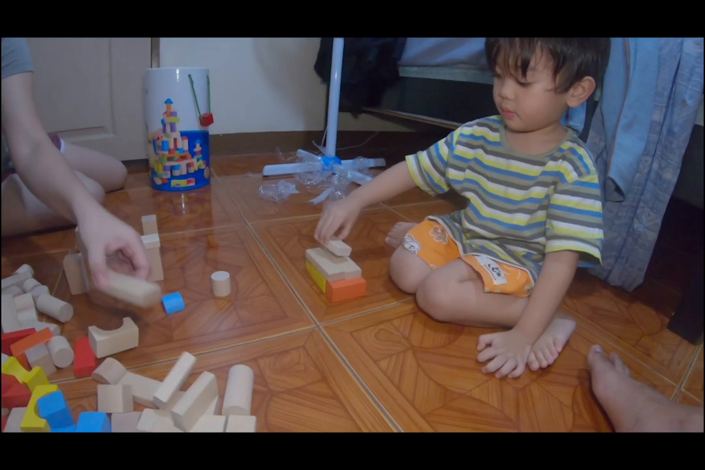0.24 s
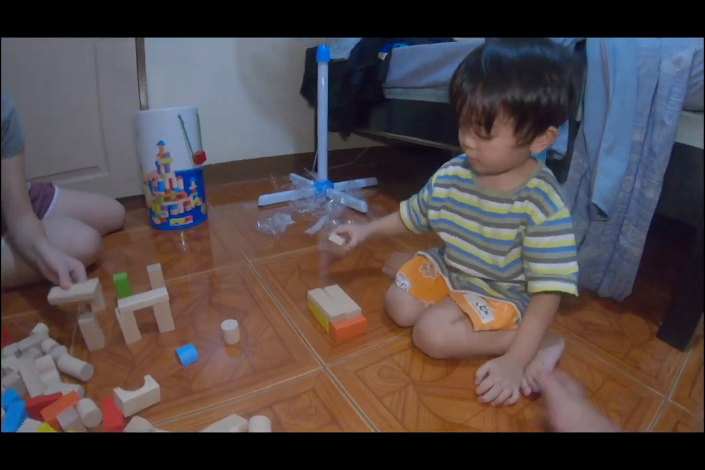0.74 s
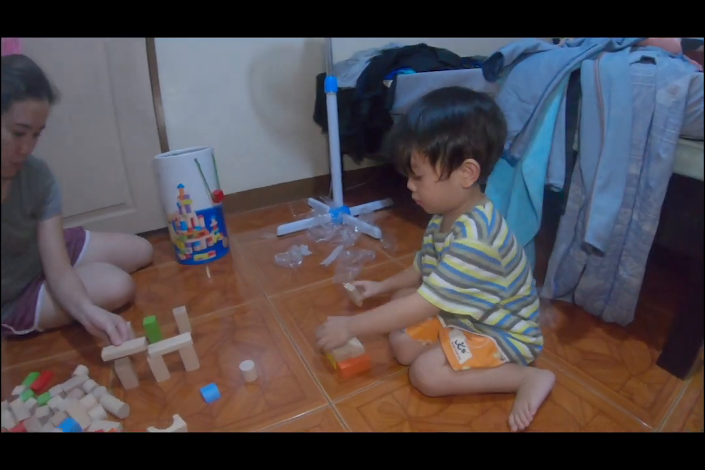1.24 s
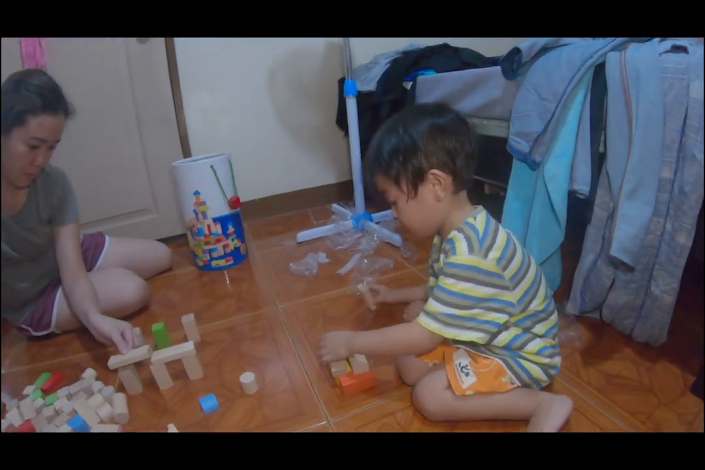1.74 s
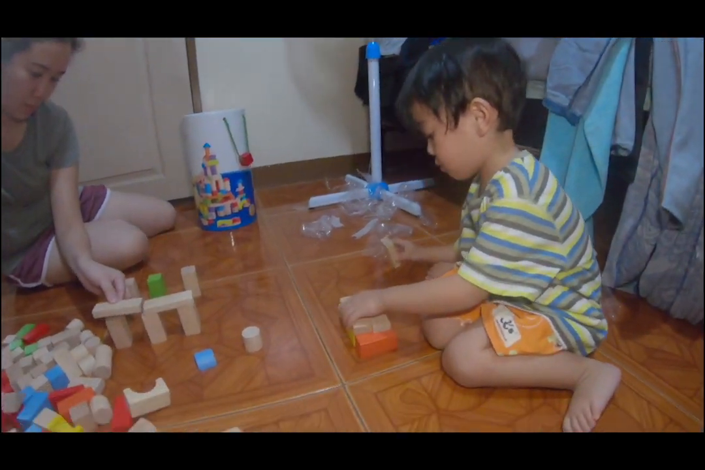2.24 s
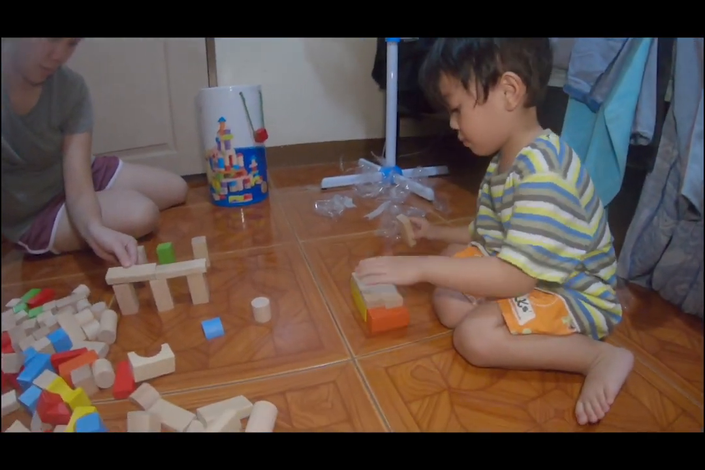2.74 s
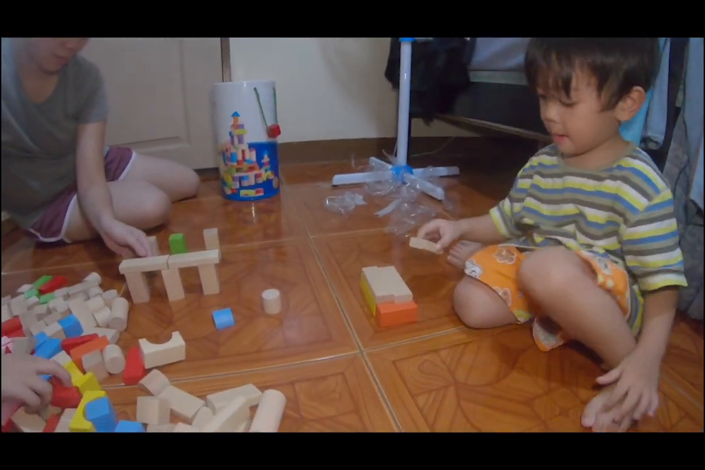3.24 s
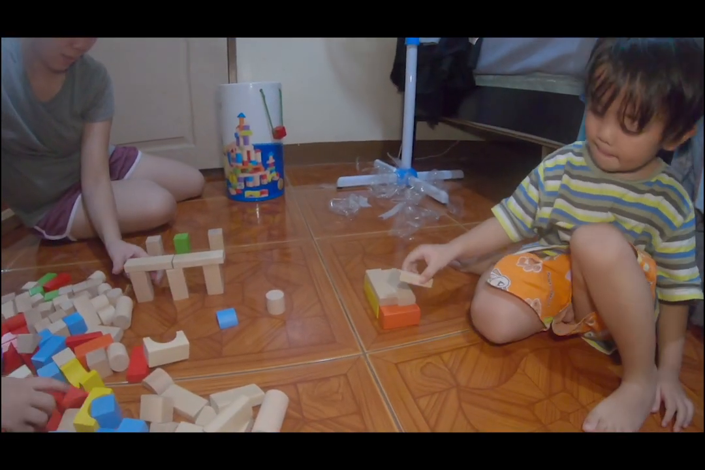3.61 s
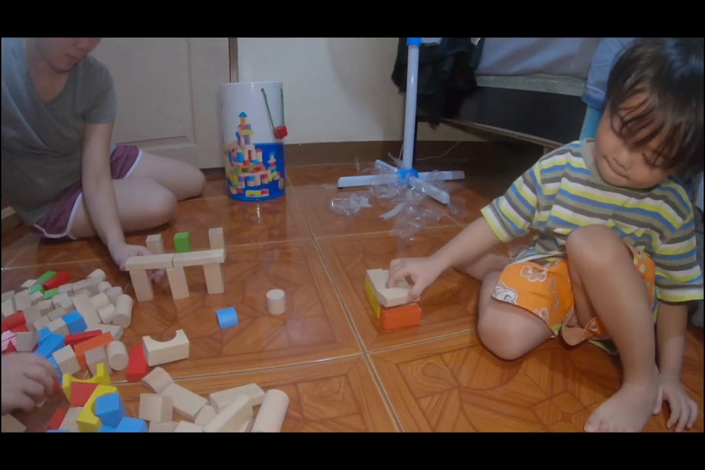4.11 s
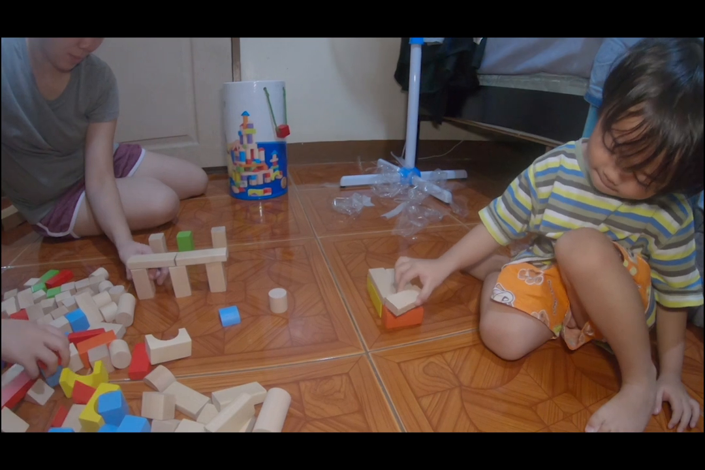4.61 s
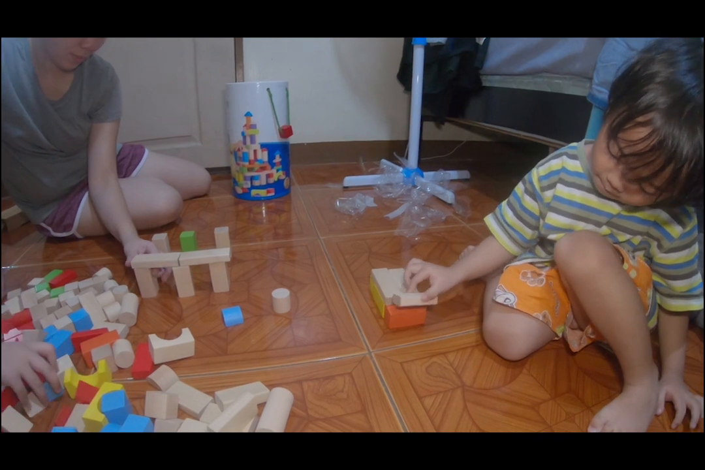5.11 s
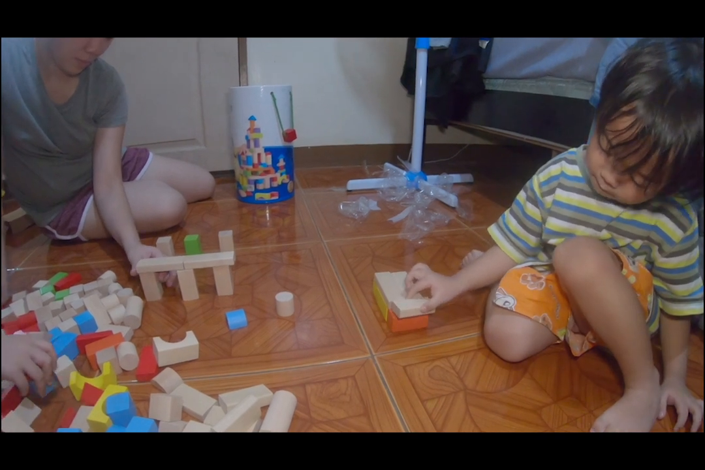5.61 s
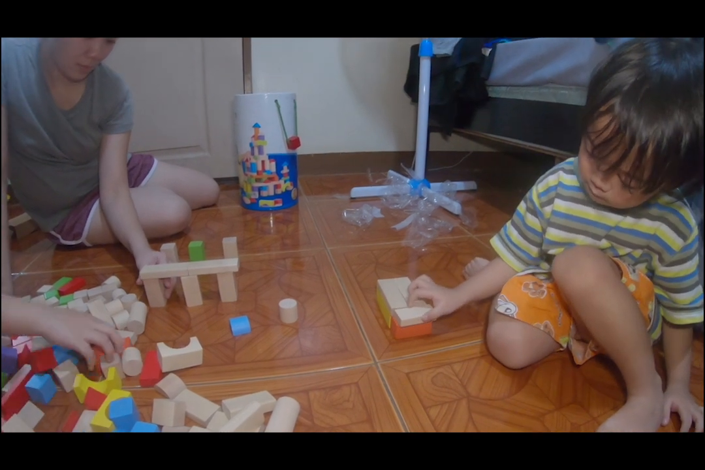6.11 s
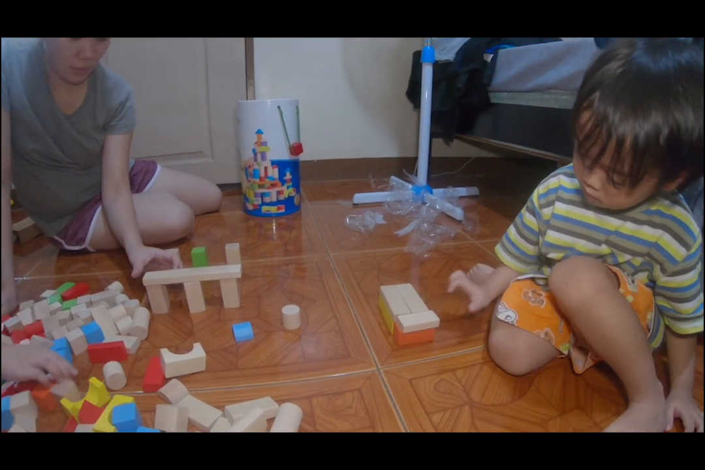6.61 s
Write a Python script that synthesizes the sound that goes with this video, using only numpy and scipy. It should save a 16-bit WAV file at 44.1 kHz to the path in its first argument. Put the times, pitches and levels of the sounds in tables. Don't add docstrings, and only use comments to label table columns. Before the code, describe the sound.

Small wood blocks are set down, stacked and shuffled on tile, with a loud clattering burst midway and soft fan noise behind.

```python
import sys
import numpy as np
from scipy import signal
from scipy.fft import rfft, irfft, next_fast_len
from scipy.io import wavfile
from scipy.ndimage import uniform_filter1d, map_coordinates

SR = 44100
rng = np.random.default_rng(int(sys.argv[2]) if len(sys.argv) > 2 else 0)


def linear_from_db(decibels):
    return 10 ** (np.asarray(decibels, float) / 20)


def inscribe(sig):
    pcm = np.round(np.clip(np.atleast_2d(sig).T, -1, 1) * 32767)
    wavfile.write(sys.argv[1], SR, pcm.astype(np.int16))


N = 302524


def along(points, hz):
    f, v = np.transpose(points)
    return np.interp(np.log(hz + 1), np.log(f + 1), v)


def unit(x):
    return x / np.sqrt(np.mean(x ** 2) + 1e-20)


def wobble(rate):
    knots = rng.standard_normal(int(N * rate / SR) + 4)
    return map_coordinates(knots, [np.arange(N) * rate / SR])


def noise(spectrum):
    m = next_fast_len(N + 8192)
    gain = linear_from_db(along(spectrum, np.fft.rfftfreq(m, 1 / SR)))
    return unit(irfft(rfft(rng.standard_normal(m)) * gain, m)[:N])


def steady(x, span_s):
    power = np.abs(uniform_filter1d(x ** 2, int(span_s * SR)))
    return unit(x / np.sqrt(power + 0.072))


def causal(gain, lag_s):
    cepstrum = irfft(np.log(gain + 1e-6))
    cepstrum[1:len(gain) - 1] *= 2
    cepstrum[len(gain):] = 0
    phase = np.pi * SR / len(gain) * np.cumsum(lag_s)
    return irfft(np.exp(rfft(cepstrum) - 1j * phase))


# f/Hz, T60/s
REVERBERATION = [(500, 0.23), (1500, 0.3), (4000, 0.3), (9000, 0.25), (13000, 0.16), (16000, 0.106)]
# delay t/s, level/dB
REFLECTIONS = [(.0027, -5), (.005, -9.5), (.013, -14), (.019, -21)]


def room_answers(wet_db, build_s, count=24):
    hz, t, z = signal.stft(rng.standard_normal((count, SR * 2 // 5)), SR, nperseg=256)
    decay = linear_from_db(-60 * t / along(REVERBERATION, hz)[:, None])
    tails = signal.istft(z * decay, SR, nperseg=256)[1]
    since = np.arange(tails.shape[1]) / SR
    tails = tails * (1 - np.exp(-since / build_s) + 0.43 * np.exp(-since / 0.008))
    tails *= linear_from_db(18 * uniform_filter1d(rng.standard_normal(tails.shape), size=100, axis=1))
    tails = linear_from_db(wet_db) * tails / np.linalg.norm(tails, axis=1, keepdims=True)
    tails[:, 0] = 1
    for s, db in REFLECTIONS:
        delays = np.round(s * SR * rng.uniform(.92, 1.08, count)).astype(int)
        tails[np.arange(count), delays] += linear_from_db(db)
    return tails


def among(s, times):
    return np.min(np.abs(s - np.array(times))) < .003


INDIRECT = [0, .831, 3.255, 3.699, 4.992, 5.046, 5.056, 5.836, 6.376, 5.932, 6.322, 6.433, 6.5905, 6.609,
            6.72]
NEAR = [.746, 3.0268, 3.0635, 3.0775, 3.1118, 3.239, 3.343, 4.386, 4.426, 5.848, 6.155, 6.237, 6.2595]
INDIRECT_DB, NEAR_DB = -8, -4
LIGHT_DRY = .1


def place(out, s, direct, spread, answer, db):
    room_db = LIGHT_DRY * db + NEAR_DB * among(s, NEAR)
    heard = signal.fftconvolve(spread, np.r_[0, linear_from_db(room_db) * answer[1:]])
    heard[:len(direct)] += direct * linear_from_db(INDIRECT_DB * among(s, INDIRECT))
    out[round(s * SR):][:len(heard)] += heard


# t/s, peak level/dB, body mode f/Hz, sharpness level/dB
STACKED = [(0.0, -17, 2960, -18), (0.274, -35, 2720, -39), (0.334, -22, 3970, -30),
           (0.368, -12.5, 4300, -29), (0.417, -22, 3100, -28), (0.473, -27, 1900, -22),
           (0.4992, -17.5, 1710, -23), (0.64, -15, 1930, -25), (0.875, -29, 2600, -23),
           (0.938, -22, 1720, -23), (1.265, -8.5, 1830, -23), (2.768, -17.5, 2530, -20.5),
           (2.986, -13.5, 2630, -12.5), (3.0056, -9, 4270, -19), (3.063, -6, 4300, -35),
           (3.117, -9, 3930, -3), (3.239, -9, 2570, -26), (3.482, -39, 2700, -38), (3.682, -18, 4300, -19),
           (3.699, -10.5, 2400, -21), (3.877, -27, 2230, -24), (3.958, -33.5, 3600, -25),
           (4.14, -29, 3820, -33), (4.386, -31, 3630, -30), (5.046, -25, 1740, -40),
           (5.136, -32, 3770, -33), (5.312, -8, 3900, -40), (5.861, -10.5, 1650, -33),
           (6.238, -24.5, 3860, -20), (6.322, -11, 1740, -31)]
ROCKED = [(.065, -27, 990, -42), (0.476, -26, 1400, -35), (.838, -26, 2220, -22), (0.9332, -35, 1470, -35),
          (1.256, -23, 1800, -41), (1.306, -33, 1820, -35), (1.374, -40, 2780, -37),
          (1.674, -49, 1500, -40), (1.697, -43, 1520, -40), (2.038, -43, 1510, -34),
          (2.715, -36, 1500, -35), (3.0832, -11, 1300, -35), (3.584, -42, 800, -40),
          (3.604, -25, 1410, -32), (4.149, -30.5, 1506, -35), (4.4412, -36, 2580, -35.5),
          (5.056, -30, 1214, -40), (5.157, -31, 1200, -35), (5.207, -34, 1210, -40),
          (5.615, -41, 1190, -34), (5.854, -22, 1500, -35), (5.924, -18, 1280, -23),
          (6.269, -32, 1400, -35), (6.353, -25, 1290, -35), (6.377, -24, 1300, -26),
          (6.458, -18, 1200, -34), (6.58, -24, 1210, -40)]
CLICKED = [(0.079, -29, 4700, -16.5), (0.211, -41, 4000, -28), (0.425, -19, 3050, -21),
           (1.7358, -13, 1690, -32), (2.1372, -10, 1580, -17), (2.902, -22, 1900, -31),
           (3.0425, -5.5, 4200, -16), (3.137, -12, 3800, -15), (3.1483, -10, 3800, -28),
           (3.162, -16, 3960, -36), (3.255, -8.5, 2460, -19.5), (3.343, -18.5, 3800, -10.5),
           (3.814, -31, 4020, -14), (3.86, -26.5, 3330, -29), (3.89, -25, 1570, -37),
           (4.481, -47, 3000, -28), (4.889, -28.5, 2580, -43), (5.9325, -8, 4400, -29),
           (6.155, -25.5, 3500, -35), (6.398, -13.5, 3120, -30), (6.4136, -15, 1760, -43),
           (6.5898, -10, 1290, -29), (6.8058, -8, 3800, -12.5)]
CORNERS = [(0.111, -37, 4200, -25), (0.163, -41, 4000, -10), (1.404, -45, 3500, -12),
           (2.187, -19, 3200, -17), (3.0386, -3, 4430, -16), (3.0933, -13, 2000, -20),
           (3.1118, -9, 4430, -3), (3.127, -6, 4240, -13.5), (3.605, -31, 4100, -15),
           (3.742, -29, 3960, -14), (4.116, -38, 3300, -31), (4.6193, -20.5, 3950, -7),
           (6.2591, -22.5, 3150, -15.5), (6.418, -7.5, 1800, -4.5), (6.433, -18, 4340, -7),
           (6.467, -19, 3760, -17), (6.5, -20, 1500, -22)]
SET_DOWN = [(0.149, -33.5, 3740, -5), (0.179, -32.5, 1080, -33), (0.241, -31.5, 1650, -39),
            (0.349, -32, 1770, -21), (0.441, -20.5, 2750, -21), (0.557, -35, 1120, -32),
            (0.582, -26, 1220, -42), (0.746, -33, 1190, -25), (0.831, -22, 1150, -30),
            (0.916, -30, 1260, -30), (1.046, -25.5, 1630, -41), (1.192, -30, 4040, -19),
            (1.2215, -25.5, 1600, -23), (2.704, -35, 1740, -39), (2.823, -31, 1920, -16),
            (2.963, -15, 3800, -21), (3.0268, -4, 1840, -18), (3.0775, -10, 3870, -17),
            (3.265, -15.5, 2630, -30)]
RATTLED = [(0.208, -39, 3000, -35), (.325, -38, 2500, -35), (.445, -29, 4200, -34),
           (0.6429, -21, 4700, -15.5), (.73, -40, 4300, -30), (.856, -38, 3500, -30),
           (1.2763, -29, 4300, -28), (1.992, -61, 4500, -17), (2.004, -54, 4500, -10),
           (2.794, -24, 3370, -20), (2.988, -13, 4000, -13), (3.008, -11.5, 4200, -22),
           (3.639, -39, 3800, -32), (3.052, -11, 4400, -20), (3.1326, -11, 4050, -18),
           (4.449, -38, 2400, -35), (3.7044, -17.5, 4200, -20), (3.7112, -19, 3640, -20),
           (3.72, -18.5, 3920, -22), (5.936, -14.5, 4200, -24), (5.95, -19, 1810, -21),
           (6.4203, -8, 4400, -20), (3.057, -12, 4000, -22), (3.099, -16, 3900, -24),
           (3.103, -16, 1500, -28), (3.122, -15, 4000, -20), (3.1555, -16, 4000, -22),
           (2.15, -30, 4200, -22), (5.895, -24, 1500, -28), (6.463, -19, 1300, -25),
           (3.729, -24, 3500, -25), (1.292, -26, 4500, -22), (3.019, -20, 2000, -28)]
SHUFFLED = [(3.536, -34, 860, -37.5), (3.598, -25, 853, -41), (4.426, -29.5, 2710, -35),
            (4.989, -30, 860, -43.5), (5.144, -31, 1690, -27), (5.17, -32.5, 1730, -30),
            (5.352, -14, 1850, -25.5), (5.3745, -18, 1440, -36), (5.393, -26, 1760, -32),
            (5.553, -33, 3990, -30), (5.834, -31, 1820, -27), (5.848, -19.5, 1540, -26),
            (5.919, -15, 1700, -19), (6.2137, -35.5, 3000, -27), (6.306, -17, 2600, -22),
            (6.376, -18, 1550, -23), (6.574, -27.5, 1320, -29), (6.608, -20, 1750, -13),
            (6.631, -19.5, 2740, -34), (6.638, -20, 1510, -35), (6.72, -26, 1570, -21)]
# thud level/dB, air level over sharpness/dB
KINDS = [
    (14.5, -11),
    (15.5, -14),
    (7.5, -7.5),
    (-2.5, -8),
    (7, 3),
    (8, -5.5),
    (-6, -10),
]
# f/Hz, level/dB
THUD = [(100, -31.5), (300, -20.5), (500, -14.5), (850, -3), (1200, -4), (1600, -6), (2600, -12),
        (16000, -83)]
# f/Hz, level/dB
KNOCK = [(200, -88), (900, -1.5), (1500, 2), (2300, 2.5), (4300, 4.5), (4900, -2.5), (5600, -15.5),
         (16000, -76.5)]
# f/Hz, level/dB
EDGE = [(200, -84), (3000, -7), (5000, -1), (6500, -3.5), (8500, -7.5), (10500, -25), (16000, -66)]
# f/Hz, level/dB
AIR = [(200, -93), (5000, -28), (8500, -3), (10000, -0.5), (13000, -7), (16000, -32.5), (20000, -56)]
SPOTS = 110
EDGE_DB, BLOW_DB = 13, 10.5
BODY_DB, BODY_WIDTH = 6, .11
LIGHT_RINGS = .18
ROOM_BODY = .6


def contacts(answers):
    tables = (SET_DOWN, SHUFFLED, STACKED, CLICKED, CORNERS, ROCKED, RATTLED)
    hits = [(*row, *kind) for table, kind in zip(tables, KINDS) for row in table]
    hz = np.fft.rfftfreq(1024, 1 / SR)
    colours = np.array([linear_from_db(along(c, hz)) for c in (THUD, KNOCK, EDGE, AIR)])
    small_modes = uniform_filter1d(rng.standard_normal((SPOTS, len(hz))), size=7, axis=1)
    scatter = np.abs(uniform_filter1d(rng.standard_normal(small_modes.shape), size=24, axis=1))
    lags_s = .0004 + (.002 + hz / 9e6) * scatter
    out = np.zeros(N + SR)
    for k, (s, db, body_hz, sharp_db, thud_db, air_db) in enumerate(hits):
        spot = k % SPOTS
        levels_db = [thud_db, 0, sharp_db + EDGE_DB, sharp_db + air_db]
        power = linear_from_db(levels_db) ** 2 @ colours ** 2
        plain = np.sqrt(power) * linear_from_db(5 * small_modes[spot])
        detuning = (hz - body_hz) / (BODY_WIDTH * body_hz)
        body_db = (BODY_DB - LIGHT_RINGS * db) / (1 + detuning ** 2)
        direct = linear_from_db(db + BLOW_DB) * causal(plain * linear_from_db(body_db), lags_s[spot])
        spread = linear_from_db(db + BLOW_DB) * causal(plain * linear_from_db(ROOM_BODY * body_db), lags_s[spot])
        place(out, s, direct, spread, answers[k % len(answers)], db)
    return out[:N]


# t/s, peak level/dB, f/Hz
RINGS = [(.179, -51, 1110), (.746, -24, 1050), (.334, -46, 7840), (.3684, -30, 7850), (.425, -37, 7950),
         (.441, -37, 7650), (.498, -35, 6850), (.64, -35, 11400), (1.265, -26.5, 8170), (2.137, -27, 8000),
         (2.768, -38, 7800), (2.986, -33, 6400), (3.028, -26, 6500), (3.042, -3, 6750), (3.043, -21, 11200),
         (3.094, -16, 7340), (3.1296, -7, 6670), (3.149, -16, 6760), (3.24, -26, 7400),
         (5.312, -10.5, 1180), (3.344, -28.5, 8250), (4.62, -29, 12600), (5.312, -35.5, 7460),
         (5.313, -41, 10160), (5.98, -35.5, 7830), (6.378, -39, 6800), (6.419, -21, 11600),
         (2.188, -36, 8000), (3.265, -29.5, 7430), (3.04, -16, 8600), (6.238, -42, 7400),
         (6.306, -46, 13000), (3.112, -7, 7030), (3.112, -17, 8200), (3.053, -16, 6700), (5.893, -46, 8300),
         (5.981, -38, 4330), (4.62, -38, 13600), (.242, -52, 7900), (3.815, -53, 8200), (6.419, -21, 7300)]
# t/s, peak level/dB, f/Hz
NOTES = [(1.736, -26, 1600), (1.736, -26.5, 2630), (1.736, -29, 3600), (2.1375, -22, 1550),
         (2.1375, -25, 2700), (2.1375, -22, 3450), (1.2655, -22, 1300), (1.2655, -23, 2400),
         (1.2655, -22, 3900), (3.24, -23, 2600), (3.239, -23, 1190), (3.2639, -25, 2590),
         (3.3436, -27, 4060), (5.312, -16.5, 1670), (5.3125, -20, 2900), (5.3125, -17, 4050),
         (5.353, -24, 1800), (5.863, -24, 1220), (6.305, -25, 1710), (6.307, -27.5, 910),
         (6.806, -26, 3640), (6.805, -27, 1860), (0.3688, -19, 4220), (0.369, -35, 1450),
         (0.335, -32, 3970), (3.028, -15, 1420), (3.007, -14, 4180), (3.1175, -13, 3870),
         (5.848, -27, 1570), (5.849, -29, 2530), (1.276, -27, 1800), (1.2755, -26, 4330),
         (3.064, -25, 1480), (3.078, -18, 1314), (4.387, -41, 4250), (5.92, -20, 1250), (5.375, -27, 1500),
         (5.394, -29, 1250), (3.599, -33, 950), (1.271, -27, 1800), (6.377, -21, 1500), (4.889, -36, 2600),
         (2.987, -24, 700), (2.987, -34, 520), (3.007, -30, 520), (3.04, -27, 520), (3.04, -21, 850),
         (3.064, -29, 500), (3.127, -28, 500), (3.16, -31, 480), (3.148, -32, 500), (5.92, -21, 4300),
         (5.921, -25, 2400), (4.62, -33, 1500), (5.001, -36, 1000), (3.128, -18, 1600), (6.463, -24, 1250),
         (2.188, -33, 1500)]
# t/s, peak level/dB, f/Hz
CHIMES = [
    (4.14, -30, 3710),
    (4.141, -39, 4600),
    (4.387, -39, 3600),
    (4.889, -44, 2660),
    (4.891, -44, 1720),
    (4.426, -44, 860),
]
RING_T60_S, CHIME_T60_S, NOTE_T60_S = 0.013, 0.034, 0.021
ROOM_RING_DB, ROOM_CHIME_DB, ROOM_NOTE_DB = -2, -6, -8


def free_modes(answers):
    t = np.arange(2048) / SR
    onset = (1 - np.exp(-t / 0.000153)) ** 2
    groups = ((RINGS, RING_T60_S, ROOM_RING_DB),
              (CHIMES, CHIME_T60_S, ROOM_CHIME_DB),
              (NOTES, NOTE_T60_S, ROOM_NOTE_DB))
    tones = [(*row, *kind) for table, *kind in groups for row in table]
    out = np.zeros(N + SR)
    for k, (s, db, ring_hz, t60, room_db) in enumerate(tones):
        ring = linear_from_db(db - 60 * t / t60) * np.sin(2 * np.pi * ring_hz * t) * onset
        place(out, s, ring, linear_from_db(room_db) * ring, answers[k % len(answers)], db)
    return out[:N]


def blocks():
    answers = room_answers(wet_db=-2, build_s=.012)
    return contacts(answers) + free_modes(answers)


def late_room(x):
    t60_s, level_db = 0.67, -21
    fade = linear_from_db(-60 * np.arange(SR) / SR / t60_s) ** 2
    power = signal.fftconvolve(x ** 2, fade / fade.sum())[:N]
    return linear_from_db(level_db) * np.sqrt(np.abs(power)) * noise(KNOCK)


# f/Hz, level/dB, phase waver/rad
HUM = [(58.3, -44, .8), (114.5, -57, 1.3), (151, -70.5, .5), (200, -69, .5), (359.3, -56.5, .12),
       (403.7, -63.5, .4), (519, -70, .4), (689.8, -66, .4), (747.5, -64.5, .4), (1308, -72, .6),
       (1437, -70, .6), (1497, -70, .6)]
# f/Hz, spectral level/dB per Hz
HISS = [(40, -35), (80, -40), (150, 1.5), (210, -8), (300, -9.5), (420, -5.5), (770, -5.5), (1100, -11),
        (1600, -7.5), (2500, -20.5), (4200, -16), (5500, -25), (9000, -27), (16000, -40.5)]
DUCK_S, DUCK_DB, ATTACK_S, HOLD_S, RELEASE_S = 1.22, -9.5, 0.3, 0.73, 0.5
HISS_DB, HISS_FOLLOWS = -52, 0.88


def fan():
    t = np.arange(N) / SR
    corners_s = DUCK_S + np.cumsum([0, ATTACK_S, HOLD_S, RELEASE_S])
    duck_db = np.interp(t, corners_s, [0, DUCK_DB, DUCK_DB, 0])
    lines = np.zeros(N)
    for hz, db, waver in HUM:
        level = linear_from_db(db + 3.0 + 0.3 * wobble(10.0))
        lines += level * np.sin(2 * np.pi * hz * t + waver * wobble(5.8))
    hiss_db = HISS_DB + HISS_FOLLOWS * duck_db + 0.12 * wobble(4.3)
    return linear_from_db(duck_db) * lines + linear_from_db(hiss_db) * noise(HISS)


# t/s, level/dB
DRAUGHT = [(0, -78), (1.18, -49), (1.24, -17.5), (1.4, -30.5), (1.74, -53), (1.84, -26), (2.29, -67.5),
           (3.38, -68.5), (3.47, -36), (3.54, -43), (4.38, -87.5), (4.51, -41.5), (4.66, -68), (6.1, -69.5),
           (6.24, -28), (6.42, -37), (6.5, -51), (6.86, -42)]
# usual level/dB, growth/dB per dB of draught
EDDIES = [
    (-20.5, 0.3287),
    (-35.5, .55),
    (-50, 1.06),
    (-54.5, 0.9314),
]
# f/Hz, spectral level/dB per Hz
SWAY = [(.5, 10), (3, -11), (9, 5), (16, -67), (40, -140)]
PUSH = [(4, -14.5), (11, -1), (20, 2), (32, 8), (50, -64.5), (150, -140)]
BUFFET = [(20, -15), (32, -4.5), (55, 5.5), (85, -21), (120, -42), (250, -140)]
FLUTTER = [(50, -11), (75, 5), (130, -13), (220, -20.5), (350, -44), (600, -58), (1500, -140)]
# t/s, peak level/dB
PUFFS = [(0.377, -41), (1.095, -35), (1.218, -13.5), (1.265, -7), (1.326, -16), (1.408, -16.5),
         (1.518, -20), (1.6, -31), (1.791, -30), (1.873, -20), (1.972, -31), (2.161, -34), (2.247, -30.5),
         (2.324, -34.5), (2.4, -30), (2.769, -36), (3.462, -48.5), (3.569, -54), (3.767, -33), (4.498, -53),
         (5.772, -27.5), (6.238, -18), (6.295, -25), (6.388, -23), (6.54, -34), (6.579, -31), (1.9, -30),
         (3.03, -35), (.52, -40), (5.55, -40)]
# f/Hz, spectral level/dB per Hz
PUFF = [(40, -49), (90, 2), (170, -1), (400, -24.5), (700, -31), (1500, -140)]
# t/s, peak level/dB
SHOVES = [(.55, -36), (0.848, -14), (1.1, -21), (1.3, -16), (1.6, -14.5), (1.75, -19), (2.05, -14.5),
          (2.3, -29), (2.8, -32), (3.48, -22.5), (3.95, -30), (4.481, -18.5), (5.2, -28), (5.7, -26.5),
          (6.151, -33), (6.68, -14.5)]
# f/Hz, spectral level/dB per Hz
SHOVE = [(8, -18.5), (16, 17), (30, -4.5), (50, -26), (90, -58), (250, -120)]
USUAL_DB, SHOVE_S = -55, 0.073


def draught():
    t = np.arange(N) / SR
    strength_db = np.interp(t, *np.transpose(DRAUGHT))
    sway_db, push_db, buffet_db, flutter_db = [
        db + grows * (strength_db - USUAL_DB) for db, grows in EDDIES]
    lumps = wobble(26)
    buffet = unit(linear_from_db(2.5 * lumps) * steady(noise(BUFFET), .08))
    flutter = unit(linear_from_db(3 * lumps) * steady(noise(FLUTTER), .06))
    air = linear_from_db(sway_db) * steady(noise(SWAY), 0.069)
    air += linear_from_db(push_db) * steady(noise(PUSH), 0.333)
    air += linear_from_db(buffet_db) * buffet + linear_from_db(flutter_db) * flutter
    puff = steady(noise(PUFF), 0.052)
    for s, db in PUFFS:
        near = slice(max(round((s - .05) * SR), 0), round((s + .1) * SR))
        since = t[near] - s - .015
        air[near] += linear_from_db(db - 13.0) * np.exp(-(since / 0.018) ** 2) * puff[near]
    shoves = sum(linear_from_db(db) * np.exp(-((t - s) / SHOVE_S) ** 2) for s, db in SHOVES)
    return air + shoves * steady(noise(SHOVE), 0.13)


def scene():
    wood = blocks()
    return (wood + late_room(wood) + fan() + draught())[None]


def top_cut(x):
    return signal.sosfilt(signal.butter(12, 16200, fs=SR, output="sos"), x)


def record(dry):
    top, knee = 1.02, 8
    held = dry / (1 + np.abs(dry / top) ** knee) ** (1 / knee)
    band_limit = signal.butter(12, 15900, fs=SR, output="sos")
    mix = signal.sosfiltfilt(band_limit, held)
    return top_cut(mix)


dry = scene()
out = record(dry)
inscribe(out)
```